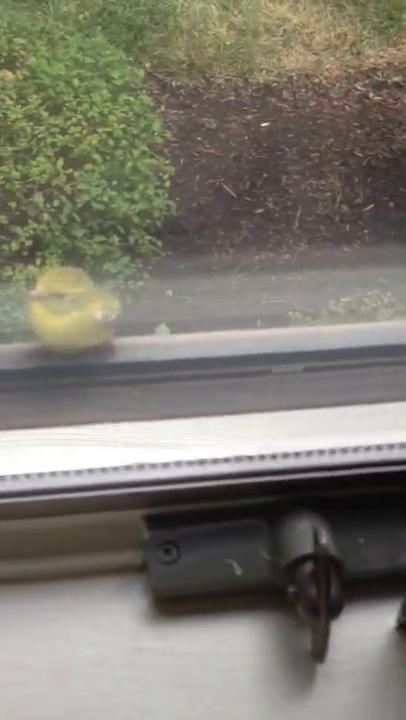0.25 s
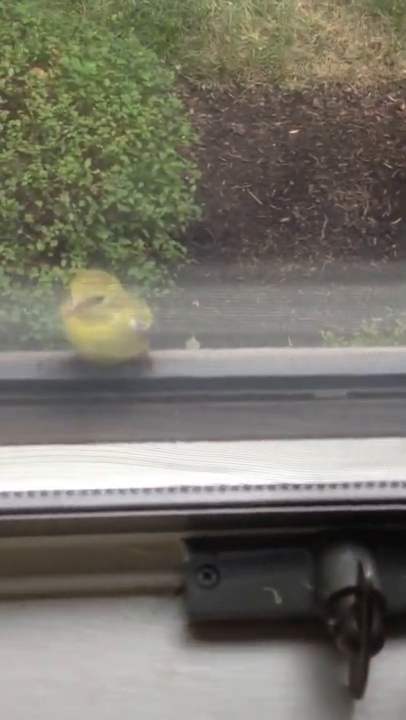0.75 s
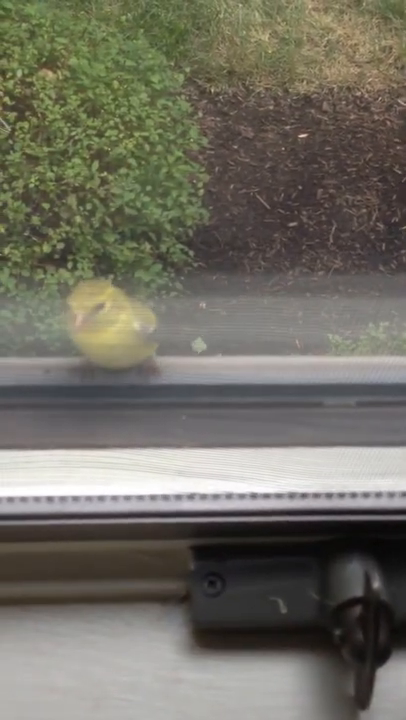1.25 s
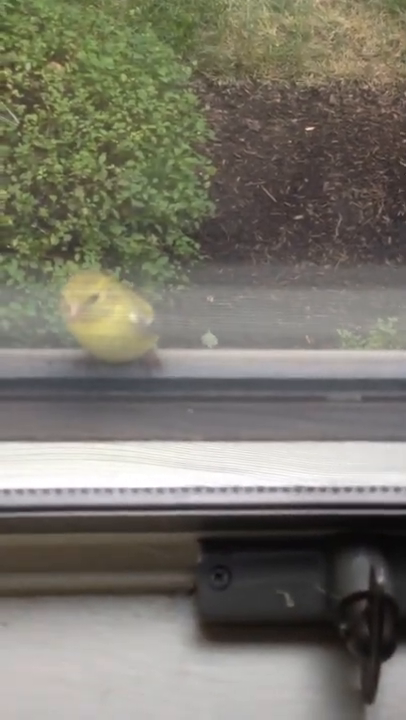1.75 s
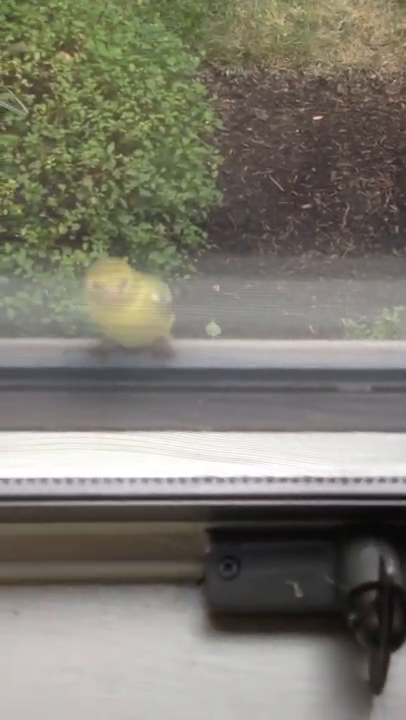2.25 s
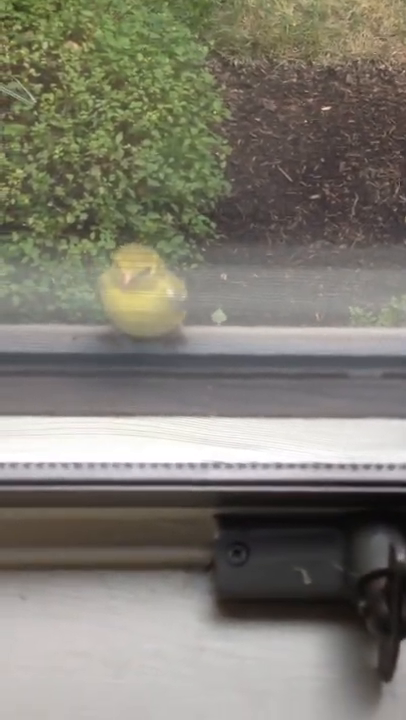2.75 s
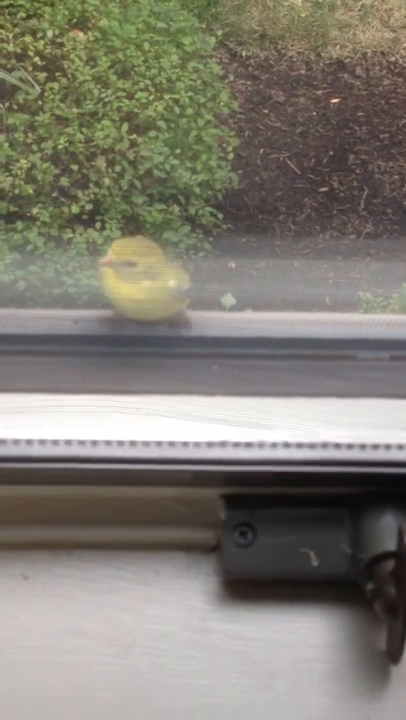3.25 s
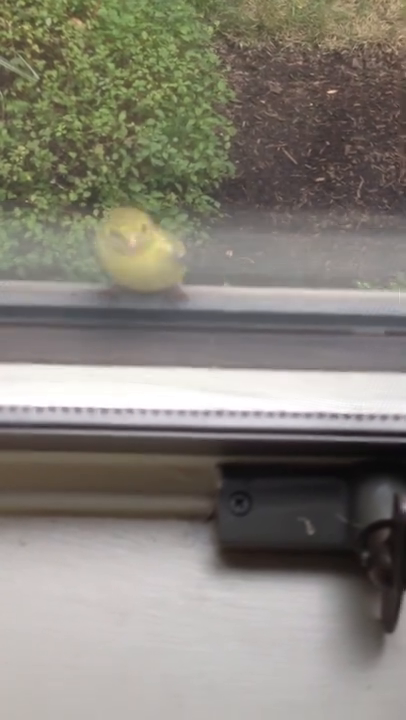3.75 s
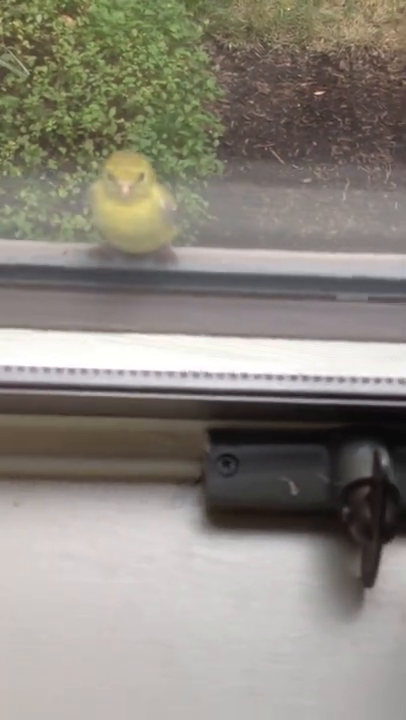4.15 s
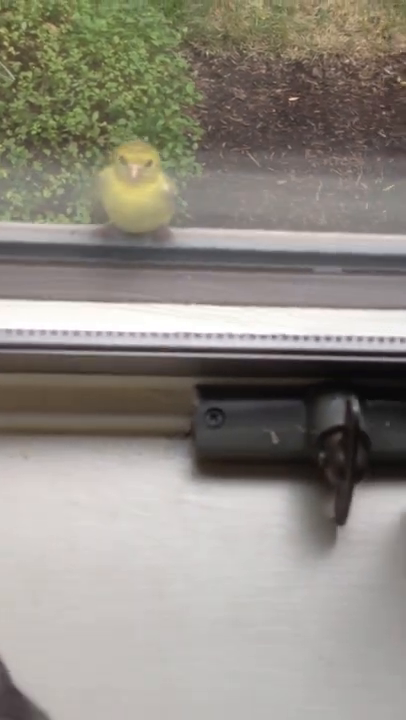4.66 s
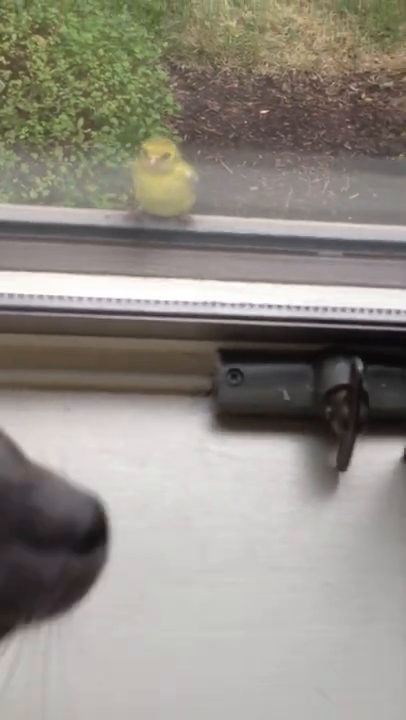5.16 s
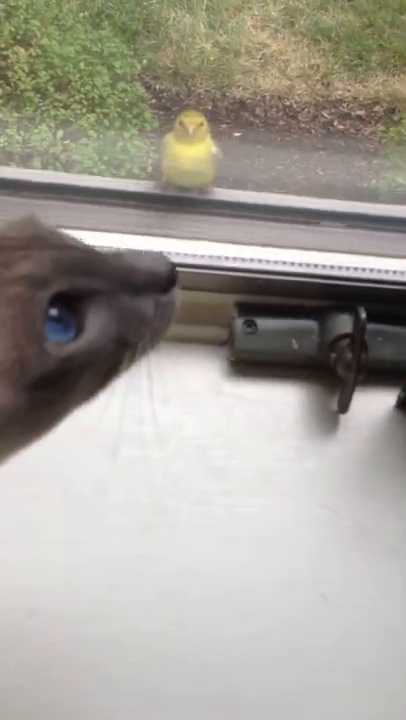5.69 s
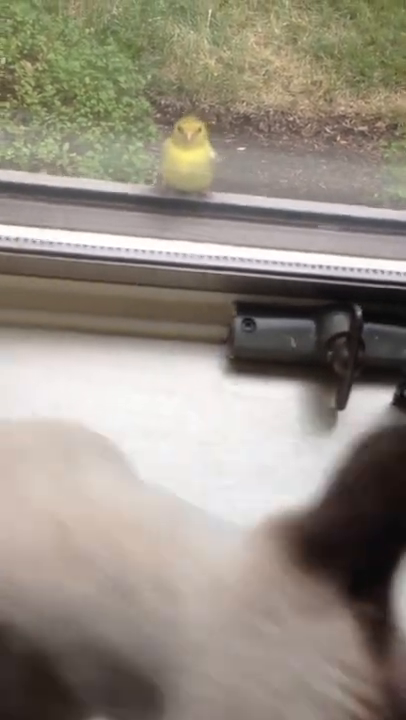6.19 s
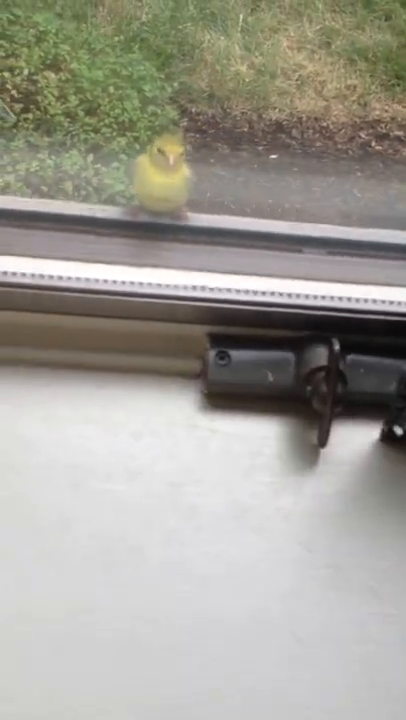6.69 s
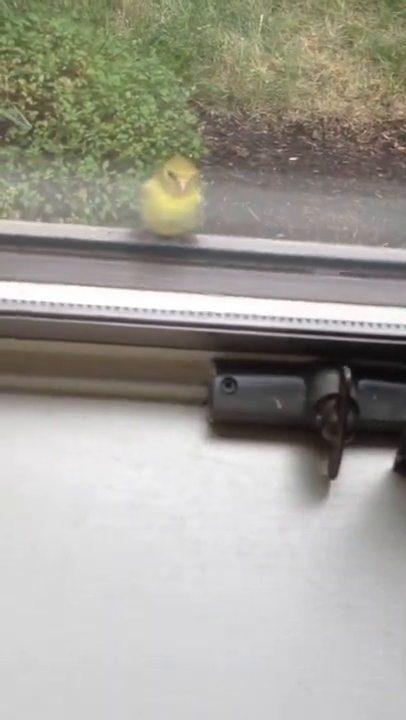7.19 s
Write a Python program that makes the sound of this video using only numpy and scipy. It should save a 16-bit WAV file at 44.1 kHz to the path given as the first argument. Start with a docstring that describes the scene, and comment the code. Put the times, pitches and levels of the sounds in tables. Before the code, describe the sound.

A quiet small room with faint low hum and soft hiss. Close to the microphone, a cat makes a breathy sinking sound, then crisp, rattling clicks in groups of three to five, about thirty a second, ringing briefly off glass and frame. Tiny moist smacks precede the groups, and long quiet gaps separate them. Late on, soft padded steps, woody knocks, claw ticks and brushing fur, then only room tone.

```python
"""A faint, falling, voiceless call, then four bursts of dry clicks, about 30 a second, led in by soft smacks:
a cat at a closed window chatters at a bird behind it. Each click is one sharp pulse that rings in the
window recess and dies away in a small room; the call is noise in a sinking mouth resonance.
Around the last burst the cat steps along the sill, with soft thuds, knocks, claw ticks and rustles.
A low hum and a little hiss lie under it all; the microphone port colours the whole."""
import sys
import numpy as np
from scipy import signal
from scipy.fft import rfft, irfft
from scipy.io import wavfile

SR = 44100
rng = np.random.default_rng(int(sys.argv[2]) if len(sys.argv) > 2 else 0)


def output_pcm(signal):
    """Save a mono or channel-first signal as 16-bit PCM at the path in sys.argv[1].

    Samples are clipped to [-1, 1] before scaling.
    """
    pcm = np.clip(np.atleast_2d(signal).T, -1, 1) * 32767
    wavfile.write(sys.argv[1], SR, np.round(pcm).astype(np.int16))


N = 327663
TIME = np.arange(N) / SR   # [s]

# room air and hiss: (frequency [Hz], relative density [dB per Hz])
AIR_COLOUR = [(15, -81.5), (25, -48), (79, -16), (93, -24), (119, -8), (148, -3), (233, -10), (260, -11),
              (399, -10.5), (433, -9.5), (684, -22.5), (6730, -31), (10100, -34), (13500, -26.5),
              (15500, -34)]
AIR_DB = -60.5
# low hum, one narrow band a row: (frequency [Hz], width [Hz], level [dB])
HUM_BANDS = [(112.6, 10, -67), (224.6, 6, -74.5), (360, 7.1, -76.5), (478, 13.6, -77)]

# ring time of the room: (frequency [Hz], t60 [s])
ROOM_RING = [(150, 0.24), (500, 0.4), (1000, 0.33), (2000, 0.15), (4000, 0.26), (9000, 0.23)]
# energy of the room's tail against the near reflections, before any wetness: (frequency [Hz], level [dB])
ROOM_TAIL = [(150, -4.5), (500, -4.5), (1200, -7.5), (2500, -6), (6000, -17), (13000, -16)]
# build-up of the near reflections at full share: (frequency [Hz], time [s])
NEAR_BUILD_UP = [(500, 0.003), (900, 0.018), (1500, 0.012), (2200, 0.0057), (6000, 0.00037)]
# standing waves and nulls of the window recess: (frequency [Hz], width [Hz], level [dB])
RECESS_MODES = [(344, 12, 0), (462.6, 18, 9), (564, 35, 4.5), (687, 13.6, 10.5), (952, 47, 6.5),
                (995.4, 79, -13.5), (1014, 20, 4.5), (1044, 102, 12.5), (1102, 10.3, -10), (1333, 53, 6),
                (1351, 90, -16.5), (1335, 23, 8), (1425, 48, 5.5), (1782, 85, -10.5), (1995, 49, 11),
                (2116, 43, 4.5), (2264, 200, 8), (2950, 13, 2), (4670, 190, 3), (5330, 480, 6)]

# soft rustles of handling, then of fur along the frame: (peak time [s], level [dB], rise [s], fall [s])
RUSTLE_SWELLS = [(.095, -64.5, .04, 0.045), (5.3, -60.5, .12, 0.61), (5.88, -63, 0.13, 0.18),
                 (6.14, -62, 0.24, .35)]
# colour of the rustles: (frequency [Hz], relative density [dB per Hz])
RUSTLE_COLOUR = [(300, -17), (600, 3), (900, -4), (1300, -3.5), (1650, -7.5), (3000, -10.5), (5000, -10),
                 (6500, -14.5), (12000, -27)]
# faint narrow hiss after the last burst: (peak time [s], level [dB], rise [s], fall [s])
LINGERING_HISS = (5.5, -64, 0.22, 0.22)
SWELL_DEPTH_DB = 17.5   # gained over one rise time, lost over one fall time

# paws on the sill, levels before make-up gain:
# (time [s], thud [dB], knock [dB], claw [dB], contact time [s])
PAW_STEPS = [(4.5603, -41.5, -49, -61, 0.0013), (5.61, -52, -68, -78, 0.0053),
             (5.870, -85, -66, -53, 0.002), (6.039, -39.5, -42.5, -49, .0012),
             (6.383, -49, -62, -65, 0.0027), (6.664, -53, -46.5, -56.5, .0018)]
# colour of a step: (frequency [Hz], relative density [dB per Hz])
STEP_COLOUR = [(50, -46), (100, -13.5), (160, 4.5), (230, -5), (330, -3), (600, -2), (1000, 1),
               (1450, -8.5), (2000, -2), (8000, -15.5)]
# resonances of the sill: (frequency [Hz], width [Hz], level [dB])
SILL_MODES = [(168, 43, 2), (322.3, 19, 11.5), (380, 11, 9), (1080, 83, -0.5)]

# the falling call: (time [s], level [dB], mouth resonance [Hz])
CALL_PATH = [(.66, -90, 1250), (.72, -57, 1160), (.77, -53, 959), (.81, -52, 880), (.85, -58, 866),
             (.90, -54, 840)]

# bursts of chatter, levels before make-up gain: (time [s], clicks [count], first gap [s], later gaps [s],
# body [dB], treble [dB], top [dB], swell [dB per click], accent of the last click [dB],
# treble change of every second click [dB])
CHATTER_BURSTS = [(0.9321, 5, 0.025, 0.031, -33, -36, -44, 0.93, -8, -0.5),
                  (2.2905, 4, .0318, .03, -31.5, -33.5, -40.5, 0, -0.5, -7),
                  (3.81, 3, .0267, .0342, -47.5, -55.5, -68, 2, 11.5, 3.5),
                  (5.1191, 4, .0328, .028, -36.5, -45.5, -51.5, 2.5, -15, 4.5)]
# harder clicks are brighter: (body, treble, top) [dB per dB of effort]
BRIGHTNESS_SLOPES = (1, 1.3, 1.83)
FIRST_CLICK_TOP_DB = -6   # the mouth is barely open on the first click
# soft smacks of the mouth before a burst, body level before make-up gain: (time [s], level [dB])
MOUTH_SMACKS = [(0.8795, -47.5), (2.2201, -51.5), (2.2489, -51), (3.7623, -48), (5.023, -61), (5.0779, -51)]
SMACK_TREBLE_DB, SMACK_TOP_DB = -2, -27   # against the body of the smack
# colour of a click: (frequency [Hz], relative density [dB per Hz])
CLICK_SPECTRUM = [(80, -33), (150, -8), (270, -16), (350, 0.5), (700, -1.5), (1100, 0.5), (1700, -2),
                  (2300, -5.5), (3300, -3), (5500, -7.5), (8500, -10.5), (11000, -30.5), (13000, -19.5),
                  (15500, -42)]
# peaks and hollows, one list for each pose of head and mouth: (frequency [Hz], width [Hz], level [dB])
HEAD_POSES = [
    [(434, 200, 0), (1435, 180, 6.5), (2190, 500, 2), (3950, 940, -3.5), (7750, 1080, 0)],
    [(1170, 1400, -1), (2670, 490, 1.5), (4170, 1100, -5), (6900, 3600, 11), (11350, 2900, -28)],
    [(1010, 610, 1), (2120, 540, -4.5), (4560, 620, 3.5), (6070, 1500, -4.5), (11930, 1200, 11)],
]
# when the cat holds each pose: (start [s], end [s])
HEAD_POSE_SPANS = [(0, 3), (3, 4.5), (4.5, 7)]


def from_db(db):
    """Decibels to gain."""
    return 10 ** (np.asarray(db) / 20)


def rms_one(x):
    """Scale to rms 1."""
    return x / np.sqrt(np.mean(x ** 2) + 1e-20)


def unit_energy(x):
    """Scale to total energy 1."""
    return x / np.sqrt(np.sum(x ** 2) + 1e-20)


def at_hz(points, hz):
    """Read a table on a log-frequency axis."""
    freqs, values = np.transpose(points)
    return np.interp(np.log(np.maximum(hz, 1)), np.log(freqs), values)


def level_curve(rows):
    """Gain over time from rows of (time [s], level [dB], ..), silent outside them."""
    s, db = np.transpose(rows)[:2]
    inside = (TIME > s[0]) & (TIME < s[-1])
    return from_db(np.interp(TIME, s, db)) * inside


def swell(peak_s, db, rise_s, fall_s):
    """Gain over time that rises to a peak and dies away."""
    away = np.maximum((peak_s - TIME) / rise_s, (TIME - peak_s) / fall_s)
    return from_db(db - SWELL_DEPTH_DB * np.minimum(away, 10))


def butter(x, hz, kind, order=2):
    """Causal Butterworth filter."""
    return signal.sosfilt(signal.butter(order, hz, kind, fs=SR, output="sos"), x)


def bells(x, rows):
    """A chain of resonant peaks and dips, rows of (frequency [Hz], width [Hz], level [dB])."""
    for hz, width_hz, db in rows:
        g = from_db(db / 2)
        k = np.pi * width_hz / SR
        c = -2 * np.cos(2 * np.pi * hz / SR)
        # the tiny offset keeps the filter from computing with denormal numbers
        x = signal.lfilter([1 + k * g, c, 1 - k * g], [1 + k / g, c, 1 - k / g], x + 1e-18)
    return x


def noise(colour):
    """Steady noise with the given spectrum, rms 1."""
    hz = np.fft.rfftfreq(N, 1 / SR)
    spectrum = rfft(rng.standard_normal(N)) * from_db(at_hz(colour, hz))
    return rms_one(irfft(spectrum, N))


def resonant_noise(hz, width_hz):
    """Noise in one resonance whose centre may move, rms 1."""
    a, b = butter(rng.standard_normal((2, N)), width_hz / 2, "low")
    phase = 2 * np.pi * np.cumsum(hz * np.ones(N)) / SR
    return rms_one(a * np.cos(phase) + b * np.sin(phase))


def with_colour(response, colour, detail=0.063):
    """Give an impulse response a smooth spectrum; minimum phase, so nothing sounds early."""
    spectrum = rfft(response)
    hz = np.fft.rfftfreq(len(response), 1 / SR)
    # smooth the present power over a width that grows with frequency
    summed = np.cumsum(np.abs(spectrum) ** 2)
    half_hz = 6 + detail * hz / 2
    power = (np.interp(hz + half_hz, hz, summed) - np.interp(hz - half_hz, hz, summed)) / half_hz
    # fold the correction's cepstrum onto positive time
    cepstrum = irfft(np.log(from_db(at_hz(colour, hz)) / np.sqrt(power + 1e-12)))
    causal = 2 * cepstrum * (np.arange(len(cepstrum)) < len(cepstrum) // 2)
    return unit_energy(irfft(spectrum * np.exp(rfft(causal))))


def add(out, s, sound):
    """Mix a sound in at time s."""
    start = int(round(s * SR))
    out[start:start + len(sound)] += sound[:N - start]


def room_response(near_t60, soft_start_db=-10, wet_db=0, build_share=1):
    """Dense reflections off glass, sill and frame, then the room's tail, dying band by band."""
    t = TIME[:SR // 2]
    hz = np.fft.rfftfreq(len(t), 1 / SR)
    edges = np.geomspace(50, SR / 2, 21)
    white = rfft(rng.standard_normal((2, len(t))))
    slowest_s = max(s for _, s in NEAR_BUILD_UP)
    out = 0
    for low, high in zip(edges, edges[1:]):
        centre = np.sqrt(low * high)
        near, far = irfft(white * ((hz >= low) & (hz < high)), len(t))
        peak_s = build_share * at_hz(NEAR_BUILD_UP, centre)
        # a band that builds up slowly also starts softly
        rise_db = soft_start_db * np.maximum(peak_s - t, 0) / slowest_s
        near = near * from_db(rise_db - 60 * np.maximum(t - peak_s, 0) / near_t60)
        far = far * from_db(-60 * t / at_hz(ROOM_RING, centre)) * (1 - np.exp(-t / peak_s))
        tail_gain = from_db(at_hz(ROOM_TAIL, centre) + wet_db)
        band = unit_energy(near) + tail_gain * unit_energy(far)
        out = out + unit_energy(band) * np.sqrt(high - low)
    return out


def background():
    """Room air and hiss as broad noise; a wavering low hum as narrow bands of noise."""
    hum = sum(from_db(db) * resonant_noise(hz, width_hz) for hz, width_hz, db in HUM_BANDS)
    return from_db(AIR_DB) * noise(AIR_COLOUR) + hum


def rustles():
    """Handling and fur brushing the frame: coloured noise that swells and fades."""
    return sum(swell(*rustle) for rustle in RUSTLE_SWELLS) * noise(RUSTLE_COLOUR)


def lingering_hiss():
    """Two narrow bands of noise swell and fade together after the last burst."""
    bands = resonant_noise(1310, 110) + from_db(-9) * resonant_noise(2080, 160)
    return swell(*LINGERING_HISS) * bands


def steps(thud_hz=520, knock_hz=(500, 1900), claw_hz=(1900, 5000), makeup_db=28):
    """A pad presses on the sill: a thud, a woody knock and a tick of claws."""
    out, t = np.zeros(N), TIME[:SR // 8]
    response = room_response(near_t60=0.081, soft_start_db=0, wet_db=3.5, build_share=0.42)
    for s, thud_db, knock_db, claw_db, contact_s in PAW_STEPS:
        push = rng.standard_normal(len(t)) * t * np.exp(-t / contact_s)
        in_room = signal.fftconvolve(push, response)
        hit = bells(with_colour(in_room, STEP_COLOUR, detail=0.11), SILL_MODES)
        thud = butter(hit, thud_hz, "low", order=4)
        knock = butter(hit, knock_hz, "band")
        claw = butter(hit, claw_hz, "band")
        for db, part in [(thud_db, thud), (knock_db, knock), (claw_db, claw)]:
            add(out, s, from_db(db + makeup_db) * unit_energy(part))
    return out


def falling_call():
    """Air rushes through the cat's mouth, whose main resonance sinks as it closes."""
    s, _, hz = np.transpose(CALL_PATH)
    mouth_hz = np.interp(TIME, s, hz)
    breath = resonant_noise(mouth_hz, 270)
    breath += from_db(-7.5) * resonant_noise(1.4 * mouth_hz, 260)
    breath += from_db(-0.5) * resonant_noise(0.5 * mouth_hz, 170)
    breath += from_db(-6.5) * resonant_noise(3850, 3000)
    return level_curve(CALL_PATH) * rms_one(breath)


def burst_clicks(burst):
    """The jaw quivers, steadily after the first gap: rows of (time [s], body, treble, top [dB])."""
    (start, clicks, first_gap_s, gap_s, body_db, treble_db, top_db,
     swell_db, last_db, second_db) = burst
    k = np.arange(round(clicks))
    times = start + (k > 0) * (first_gap_s + (k - 1) * gap_s)
    effort_db = swell_db * k + last_db * (k == k[-1])
    body, treble, top = np.outer(BRIGHTNESS_SLOPES, effort_db)
    body = body_db + body
    treble = treble_db + treble + second_db * (k % 2)
    top = top_db + top + FIRST_CLICK_TOP_DB * (k == 0)
    return list(zip(times, body, treble, top))


def mouth_clicks():
    """The dull smacks and the clicks of all bursts: rows of (time [s], body, treble, top [dB])."""
    smacks = [(s, db, db + SMACK_TREBLE_DB, db + SMACK_TOP_DB) for s, db in MOUTH_SMACKS]
    return smacks + [click for burst in CHATTER_BURSTS for click in burst_clicks(burst)]


def click_parts(response, split_hz=1900, top_hz=10200):
    """Split a click's ringing into body, treble and top, each of energy 1."""
    body = butter(butter(response, split_hz, "low"), split_hz, "low")
    treble = butter(butter(response, split_hz, "high"), split_hz, "high")
    treble = butter(treble, top_hz, "low", order=8)
    top = butter(response, top_hz, "high", order=8)
    return np.array([unit_energy(part) for part in (body, treble, top)])


def chatter(makeup_db=(28, 26.5, 24.0), pose_change=0.44, crackle=0.36, crackle_s=0.00094):
    """Each click is one sharp pulse; all share one ringing, which changes only with the head's pose."""
    out, t = np.zeros(N), TIME[:SR // 100]
    shared, *own = [room_response(near_t60=0.05) for _ in range(len(HEAD_POSES) + 1)]
    for (start, end), pose, change in zip(HEAD_POSE_SPANS, HEAD_POSES, own):
        ringing = with_colour(shared + pose_change * change, CLICK_SPECTRUM)
        parts = click_parts(bells(ringing, RECESS_MODES + pose))
        for s, *levels_db in mouth_clicks():
            if start <= s < end:
                click = from_db(np.add(levels_db, makeup_db)) @ parts
                # a few milliseconds of moist crackle follow the pulse
                pulse = crackle * unit_energy(rng.standard_normal(len(t)) * np.exp(-t / crackle_s))
                pulse[0] += 1
                add(out, s, signal.fftconvolve(click, pulse))
    return out


def scene():
    """The quiet room, the cat's fur and paws, then its mouth, in mono."""
    around = background() + rustles() + steps()
    mouth = lingering_hiss() + falling_call() + chatter()
    return (around + mouth)[None]


def record(dry):
    """The microphone port has dips near 10 and 12.5 kHz; the top is cut steeply at 15.5 kHz."""
    coloured = bells(dry, [(10100, 1620, -6.5), (12560, 800, -8.5)])
    return signal.sosfilt(signal.ellip(10, 0.3, 70, 15500, fs=SR, output="sos"), coloured)


dry = scene()
out = record(dry)
output_pcm(out)
```